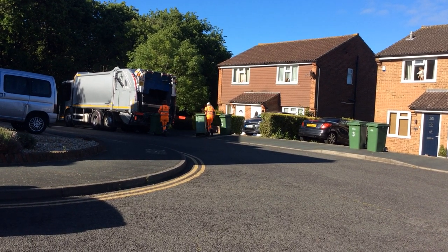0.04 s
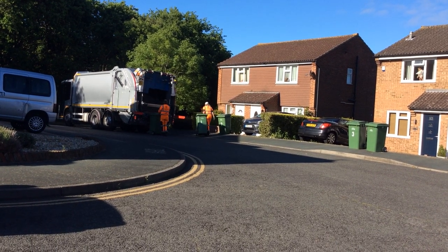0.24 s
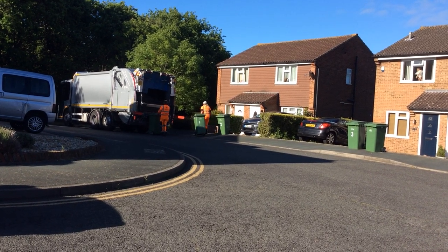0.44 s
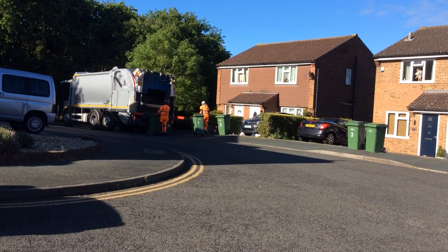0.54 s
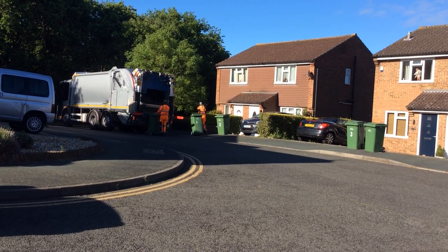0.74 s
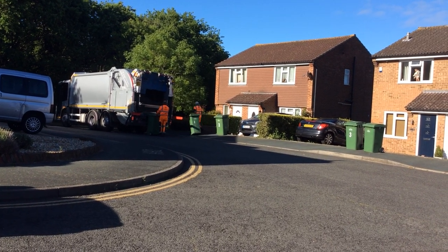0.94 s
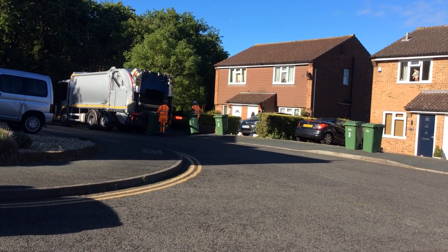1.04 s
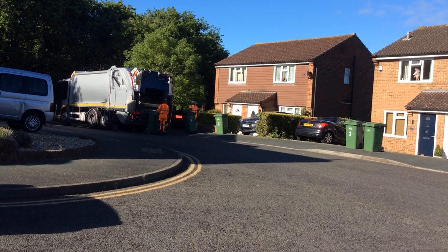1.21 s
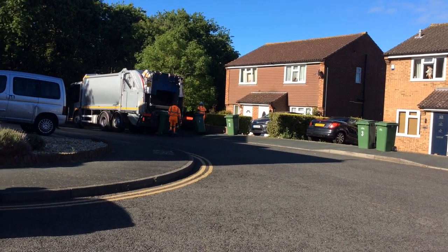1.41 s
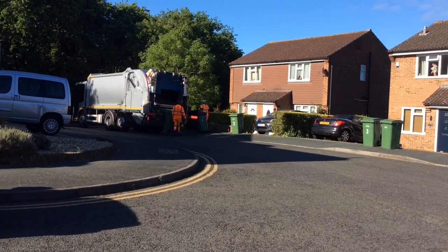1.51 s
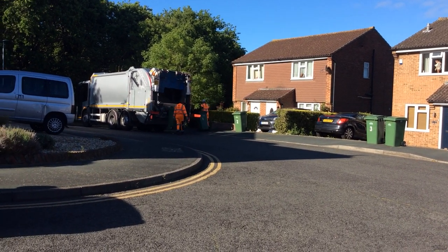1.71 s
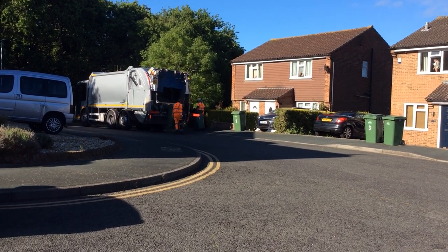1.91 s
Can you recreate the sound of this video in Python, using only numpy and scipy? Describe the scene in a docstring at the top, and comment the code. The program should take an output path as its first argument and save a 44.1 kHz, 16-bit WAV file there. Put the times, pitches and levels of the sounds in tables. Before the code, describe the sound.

Idling bin lorry hums and hisses as its lifter clanks and plastic bins knock and roll.

```python
"""A refuse lorry idles across a residential street, its engine humming under a steady hiss,
while a wheelie bin rumbles over the tarmac. The lifter rattles, then latches with one loud steel clank;
a hollow plastic bin thumps and rebounds. Another is dragged and trundled along, knocking and clacking.
A few faint pips sound, and the hydraulic pump starts to whine near the end.
One microphone, light in the deep bass, takes it all in as the house fronts throw the sound back."""
import sys
import numpy as np
from scipy import signal
from scipy.fft import rfft, irfft
from scipy.io import wavfile

SR = 44100
rng = np.random.default_rng(int(sys.argv[2]) if len(sys.argv) > 2 else 0)


def inscribe(sig):
    """Save sig as 16-bit PCM at rate SR to the path in sys.argv[1].

    A 1-D sig is mono; a 2-D sig holds one channel per row.
    Samples are clipped to [-1, 1] before scaling.
    """
    pcm = np.round(np.clip(np.atleast_2d(sig).T, -1, 1) * 32767)
    wavfile.write(sys.argv[1], SR, pcm.astype(np.int16))


N = 85995

# modes of a bin's plastic walls: pitch_hz
WALL_HZ = [196, 260, 357, 412, 458, 541, 606]
# the same modes: relative_db, t60_s
WALL_MODES = [(-4.5, 0.11), (-4, 0.29), (-4, 0.54), (2, 0.14), (-1, 0.13), (1.5, 0.15), (-7, 0.15)]


def amp(db):
    """Decibels to gain."""
    return 10 ** (np.asarray(db) / 20)


def unit(x):
    """Scales to rms 1."""
    return x / np.sqrt(np.mean(x ** 2) + 1e-20)


def at_frequency(points, hz):
    """Reads (frequency_hz, value) points on a log-frequency axis."""
    f, value = np.transpose(points)
    return np.interp(np.log(hz + 1), np.log(f + 1), value)


def level(points):
    """Gain curve through (time_s, level_db) points."""
    return amp(np.interp(np.arange(N) / SR, *np.transpose(points)))


def colour(x, spectrum):
    """Filters x by a spectrum, at rms 1."""
    gain = amp(at_frequency(spectrum, np.fft.rfftfreq(N, 1 / SR)))
    return unit(irfft(rfft(x) * gain, N))


def drift(rate_hz):
    """Random motion, mostly slower than rate_hz, at rms 1."""
    rolloff = 1 + (np.fft.rfftfreq(N, 1 / SR) / rate_hz) ** 4
    return unit(irfft(rfft(rng.standard_normal(N)) / rolloff, N))


def waver(phase, depth, rate_hz):
    """A tone at rms 1 whose strength and phase wander."""
    return unit((1 + depth * drift(rate_hz)) * np.sin(phase) + depth * drift(rate_hz) * np.cos(phase))


def fade(t60_s):
    """Exponential decay, 60 dB down after t60_s."""
    return np.exp(-np.log(1000) * np.arange(N) / SR / t60_s)


def play(starts_s, levels_db, sound):
    """Calls sound() for each start and mixes it in at its level."""
    out = np.zeros(N)
    for start_s, db in zip(starts_s, levels_db):
        at = int(np.clip(round(start_s * SR), 0, N - 1))
        out[at:] += amp(db) * sound()[:N - at]
    return out


def ring(pitches, modes, rise_s):
    """Maker of an object's ring; each blow rings the modes with fresh random phases."""
    t = np.arange(N) / SR
    partials = [amp(db) * fade(t60) * np.exp(2j * np.pi * hz * t) for hz, (db, t60) in zip(pitches, modes)]
    partials = (1 - np.exp(-t / rise_s)) * np.array(partials)
    return lambda: (np.exp(2j * np.pi * rng.random(len(partials))) @ partials).real


def hollow(pitches, modes, push_s=0.0032):
    """Maker of a bin's ring: a soft push starts the modes from rest, neighbours in opposite directions."""
    t = np.arange(N) / SR
    swing = sum((-1) ** k * amp(db) * fade(t60) * np.sin(2 * np.pi * hz * t)
                for k, (hz, (db, t60)) in enumerate(zip(pitches, modes)))
    return lambda: (1 - np.exp(-t / push_s)) * swing


def burst(spectrum, t60_s):
    """Maker of dying puffs of dense modes: decaying noise through a minimum-phase filter."""
    size = 2048
    gain_db = at_frequency(spectrum, abs(np.fft.fftfreq(size, 1 / SR)))
    log_gain = np.log(amp(np.maximum(gain_db, -100)))
    taps = np.fft.ifft(np.exp(np.conj(signal.hilbert(log_gain)))).real[:size // 2]
    taps /= np.linalg.norm(taps)
    envelope = fade(t60_s)
    return lambda: signal.oaconvolve(rng.standard_normal(N) * envelope, taps)[:N]


def street(x, wet_db):
    """The house fronts return distinct echoes and a diffuse tail to the microphone."""
    # decay of the street: frequency_hz, t60_s
    decay_times = [(100, 0.61), (400, 0.9), (1000, 0.8), (3500, 0.58), (9000, 0.37)]
    # echoes off house fronts: delay_s, relative_gain
    echoes = [(.018, 0.22), (.04, 0.31), (0.047, 0.1), (0.1, 0.21)]
    hz, t, noise = signal.stft(rng.standard_normal(N), SR, nperseg=256)
    decay = np.exp(-np.log(1000) * t / at_frequency(decay_times, hz)[:, None])
    tail = signal.istft(noise * decay, SR, nperseg=256)[1][:N]
    tail /= np.linalg.norm(tail)
    for delay_s, gain in echoes:
        tail[round(delay_s * SR)] += gain
    return x + amp(wet_db) * signal.fftconvolve(x, tail)[:N]


def lorry():
    """Across the street: engine hum, a roar that throbs with the firing, hiss and a late pump whine."""
    # tones of the engine hum: pitch_hz, level_db
    hum_tones = [(65, -63), (91.5, -62), (129.4, -61.5), (194.6, -59), (262, -67), (355.3, -68)]
    # engine roar: frequency_hz, density_db
    roar_spectrum = [(20, -48), (30, -37), (45, -7), (75, 0), (110, -17), (160, -3.5), (225, -5.5),
                     (350, -4.5), (560, -4.5), (700, -19), (900, -12), (1600, -15), (2200, -20.5),
                     (3000, -43), (5000, -92)]
    # hiss: frequency_hz, density_db
    hiss_spectrum = [(1200, -16.5), (2250, -15), (2550, -5.5), (2850, 0), (3450, 3), (4000, -3),
                     (4700, -14.5), (6200, -17), (7500, -24.5), (9800, -21.5), (11000, -29), (12500, -41),
                     (15500, -37)]
    # course of the hiss: time_s, level_db
    hiss_levels = [(0, -47.5), (.35, -48.5), (.55, -50.5), (1.2, -50), (1.4, -50.5), (1.95, -51)]
    firing_hz, whine_hz, whine_start_s, whine_rise_s = 30.6, 974, 1.26, 0.26
    t = np.arange(N) / SR
    speed = 1 + 0.00267 * drift(rate_hz=3.74)  # hum, whine and firing waver together
    phase_per_hz = 2 * np.pi * np.cumsum(speed) / SR
    hum = np.zeros(N)
    for hz, db in hum_tones:
        flutter = 1 + 0.55 * drift(rate_hz=5.2)
        phase = hz * phase_per_hz + 2 * np.pi * rng.random()
        hum += amp(db) * flutter * waver(phase, depth=0.26, rate_hz=18)
    swell = np.clip((t - whine_start_s) / whine_rise_s, 0, 1)
    whine = amp(-64) * swell * waver(whine_hz * phase_per_hz, depth=0.43, rate_hz=8.1)
    throb = 1 + 0.093 * np.cos(firing_hz * phase_per_hz)
    roar = amp(-54.5) * colour(throb * rng.standard_normal(N), roar_spectrum)
    flicker = amp(0.77 * drift(rate_hz=130))
    hiss = level(hiss_levels) * colour(flicker * rng.standard_normal(N), hiss_spectrum)
    return hum + whine + roar + hiss


def wheels():
    """Small bumps in the tarmac shake a rolling bin and ring its walls."""
    # course of the rumble: time_s, level_db
    rumble_levels = [(0, -48), (.3, -45), (.62, -49), (.8, -52), (1, -55.5), (1.28, -53.5), (1.43, -50),
                     (1.6, -52.5), (1.72, -53.5), (1.84, -56.5), (1.95, -45)]
    # body of the rolling bin: frequency_hz, density_db
    body_spectrum = [(20, -45), (40, -42), (80, -1.5), (170, 1), (350, 1), (560, -6), (720, -17),
                     (1300, -12), (2300, -18), (3300, -14.5), (6000, -37), (12000, -66)]
    bumps_per_s, spread_db = 110, 3.5
    hits = rng.random(N) < bumps_per_s / SR
    strength = amp(spread_db * np.clip(rng.standard_normal(N), -2, 2))
    bumps = hits * strength * rng.choice([-1, 1], N)
    walls = unit(signal.fftconvolve(bumps, hollow(WALL_HZ, WALL_MODES)())[:N])
    rumble = colour(bumps, body_spectrum) + amp(-13.5) * walls
    return level(rumble_levels) * unit(street(rumble, wet_db=0.5))


def lifter():
    """On the lorry's lifter, steel meets steel in a quick cluster of contacts; loose fittings jingle."""
    # steel blows: start_s, relative_db
    blows = [(.107, -25.5), (0.2284, -12), (.2312, 0), (0.2336, -11), (0.238, -14.5), (0.4, -29)]
    # modes of the lifter: pitch_hz
    steel_hz = [1990, 2540, 3194, 3482, 3565, 3630, 3779, 4027, 4210, 4598, 4735, 6024, 7773, 9232]
    # the same modes: relative_db, t60_s
    steel_modes = [(-9.5, 0.09), (-7, 0.14), (-3.5, 0.12), (0, 0.12), (-7, 0.093), (-5, 0.076), (-11, 0.08),
                   (-1, 0.1), (-15, 0.079), (-6, 0.097), (-10.5, 0.067), (-16, 0.047), (-23, 0.08),
                   (-12.5, 0.049)]
    # dense clash of the steel: frequency_hz, density_db
    clash_spectrum = [(150, -19), (400, -21), (700, -20.5), (1150, -8.5), (1600, -17.5), (2300, -15),
                      (2850, -13.5), (3150, -1.5), (3350, -5.5), (3600, -1.5), (4500, -8), (5050, -17),
                      (6150, -13), (7250, -24), (10800, -25.5), (13000, -35.5), (15500, -42)]
    # dry snap of each contact: frequency_hz, density_db
    snap_spectrum = [(300, -18), (1500, -16), (2400, -8), (3200, 2.5), (4200, -2.5), (6000, -9.5),
                     (9500, -18.5), (12000, -24), (15500, -33)]
    # shakes of the fittings: start_s, relative_db
    shakes = [(.031, 0), (.046, 1.5), (0.061, -11), (0.11, 0), (0.188, 0), (.397, -8), (1.107, -6.5),
              (1.627, -19)]
    # their jingle: frequency_hz, density_db
    jingle_spectrum = [(2000, -21), (4000, -4), (6000, 4), (7200, -3), (9500, 0), (12000, -12),
                       (15500, -39)]
    steel = ring(steel_hz, steel_modes, rise_s=0.00042)
    clash = burst(clash_spectrum, t60_s=0.11)
    snap = burst(snap_spectrum, t60_s=0.019)
    clanks = play(*np.transpose(blows),
                  lambda: amp(-19.5) * snap() + amp(-26) * steel() + amp(-22) * clash())
    jingles = amp(-54.5) * play(*np.transpose(shakes), burst(jingle_spectrum, t60_s=0.16))
    return street(clanks + jingles, wet_db=-10.5)


def lid_and_axle_clacks():
    """Lids and axles snap against the bins as they are handled."""
    # contacts: start_s, relative_db
    contacts = [(.108, -4), (0.557, -4.5), (0.577, -4), (1.336, 0), (1.405, -4.5), (1.512, -3), (1.566, -3),
                (1.628, -3), (1.766, -3), (1.916, -5)]
    # one dry clack: frequency_hz, density_db
    clack_spectrum = [(300, -5), (750, -16.5), (1100, -11), (1650, 0.5), (2200, -16.5), (2800, 5.5),
                      (3600, 1.5), (4600, -14.5), (6500, -25), (12000, -43), (15500, -62)]
    clacks = amp(-43.5) * play(*np.transpose(contacts), burst(clack_spectrum, t60_s=0.086))
    return street(clacks, wet_db=-12)


def bin_knocks():
    """Each blow slaps the plastic, rings the walls and booms in the cavity."""
    # blows on the bin, each layer on its own relative scale: start_s, boom_db, wall_db, slap_db
    blows = [(0.109, -40, -17, -3.5), (0.231, -5.5, -5.5, -7), (.327, 3.5, 5, 0), (.3363, -8, 0.5, -0.5),
             (0.352, -12, -10, -0.5), (.377, -7, 2, -2), (.396, 0, -0.5, -2), (.418, -4.5, -5, -11),
             (.523, -7.5, -10, -13), (.58, -28, -8, -7), (.7, -12, -13.5, -35), (.895, -12, -23, -28),
             (1.371, -25, -12.5, -13.5), (1.44, -12, -9, -13), (1.514, -11.5, -13.5, -16),
             (1.558, -14, -6, -8), (1.621, -16, -16.5, -15), (1.764, -14, -8, -15.5),
             (1.912, -6.5, -11, -11)]
    # modes of the air inside: pitch_hz
    cavity_hz = [88, 107, 128]
    # the same modes: relative_db, t60_s
    cavity_modes = [(0.52, 0.22), (-1.9, 0.13), (0.86, 0.23)]
    # slap of the plastic: frequency_hz, density_db
    slap_spectrum = [(25, -55), (60, -27), (150, 4.5), (540, 2.5), (720, -6.5), (1000, -3.5), (2200, -12.5),
                     (3500, -6), (6000, -22), (9000, -41), (14000, -56)]
    starts_s, boom_db, wall_db, slap_db = np.transpose(blows)
    boom = amp(-38.5) * play(starts_s, boom_db, hollow(cavity_hz, cavity_modes))
    walls = amp(-40.5) * play(starts_s, wall_db, hollow(WALL_HZ, WALL_MODES))
    slap = amp(-37.5) * play(starts_s, slap_db, burst(slap_spectrum, t60_s=0.13))
    return street(boom + walls + slap, wet_db=-10)


def pips():
    """A few faint, very high pips with little of the street on them."""
    # pips: start_s, pitch_hz, level_db
    notes = [(0.395, 10080, -49.5), (.83, 8656, -59), (1.108, 8900, -61)]
    rise_s = 0.004
    t = np.arange(N) / SR
    envelope = (1 - np.exp(-t / rise_s)) * fade(t60_s=0.12)
    tones = sum(play([start_s], [db], lambda: envelope * np.sin(2 * np.pi * hz * t))
                for start_s, hz, db in notes)
    return street(tones, wet_db=-22)


def bin_drag():
    """A dragged bin judders, which keeps its walls droning unevenly."""
    # course of the drag: time_s, level_db
    drag_levels = [(.48, -73), (.55, -49), (.63, -47.5), (.73, -51.5), (.8, -53), (.9, -61)]
    # drone of the walls: pitch_hz, relative_db
    drone_tones = [(196, -7), (265, -6), (353, -2.5), (452, -9.5), (535, -11.5)]
    phase_per_hz = 2 * np.pi * np.arange(N) / SR
    drone = sum(amp(db) * waver(hz * phase_per_hz, depth=0.58, rate_hz=9.6) for hz, db in drone_tones)
    return level(drag_levels) * unit(drone)


def scene():
    """The lorry, its lifter and the bins, heard in mono from across the street."""
    return (lorry() + lifter() + bin_knocks() + lid_and_axle_clacks() + bin_drag() + wheels() + pips())[None]


def record(dry):
    """The microphone rolls off the deep bass; a steep band limit cuts the highest treble."""
    low_hz, high_hz = 42.3, 15750
    thinned = signal.sosfilt(signal.butter(3, low_hz, "highpass", fs=SR, output="sos"), dry)
    band_limit = signal.firwin(511, high_hz, window=("kaiser", 9), fs=SR)
    return signal.oaconvolve(thinned, band_limit[None], "same")


dry = scene()
out = record(dry)
inscribe(out)
```